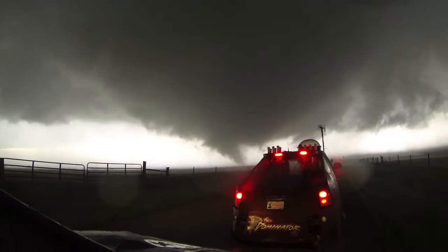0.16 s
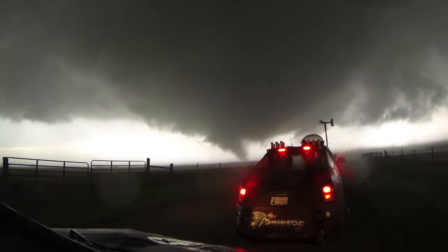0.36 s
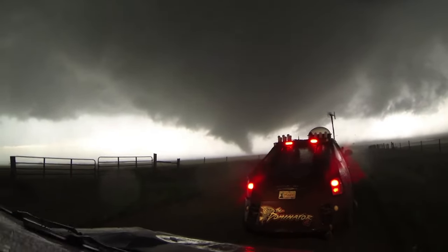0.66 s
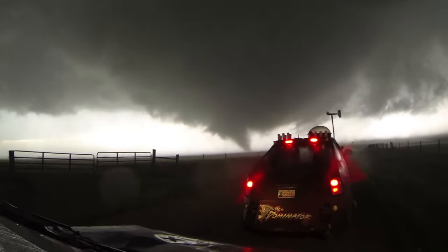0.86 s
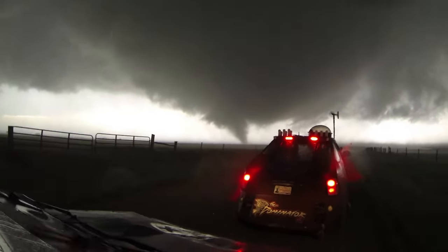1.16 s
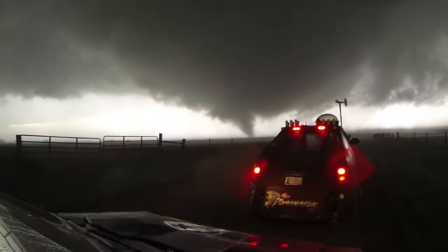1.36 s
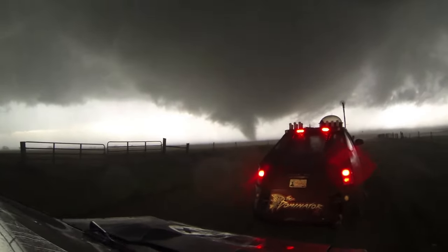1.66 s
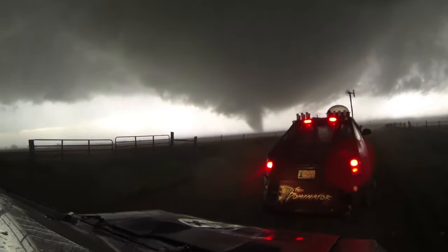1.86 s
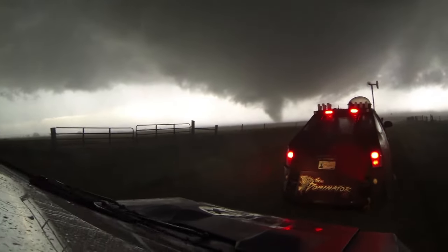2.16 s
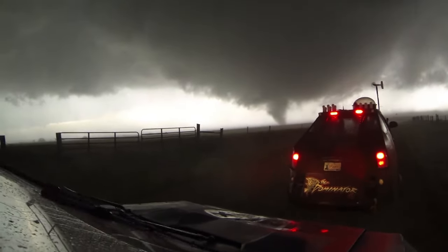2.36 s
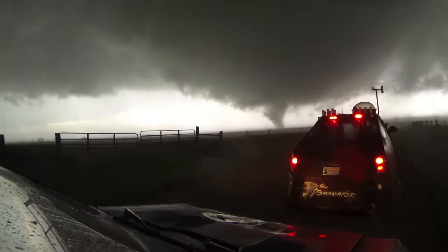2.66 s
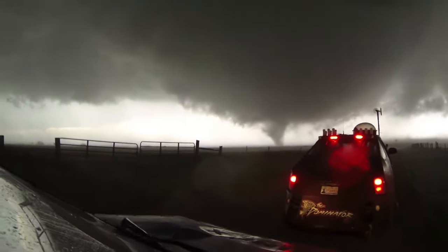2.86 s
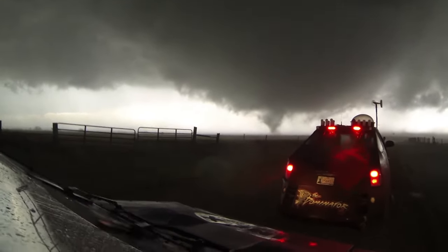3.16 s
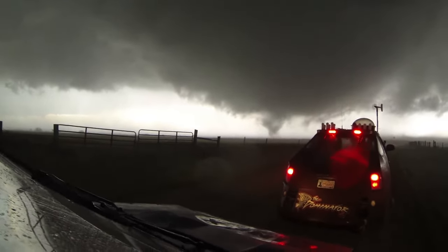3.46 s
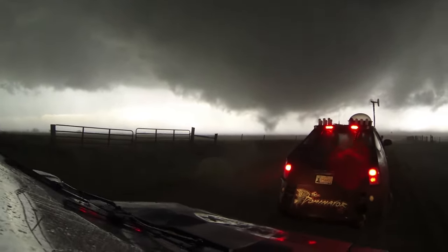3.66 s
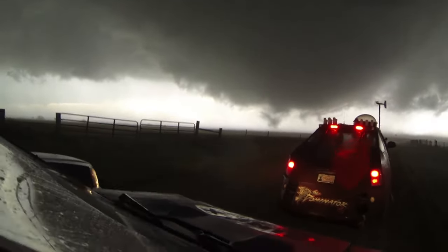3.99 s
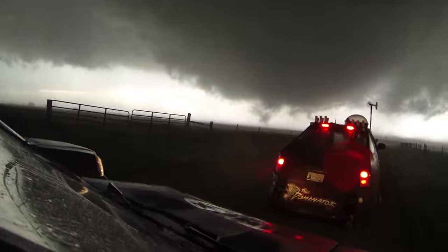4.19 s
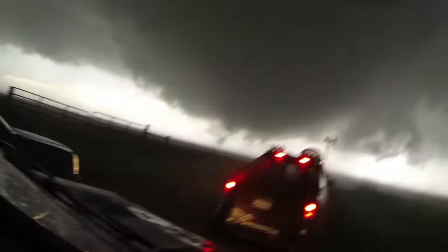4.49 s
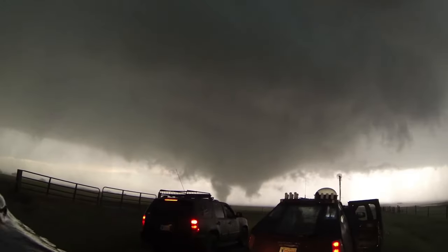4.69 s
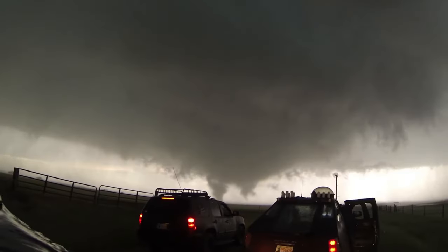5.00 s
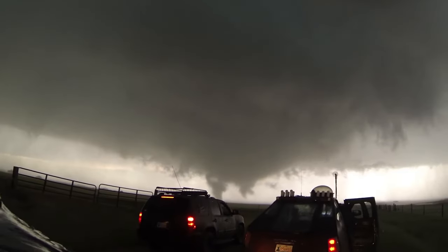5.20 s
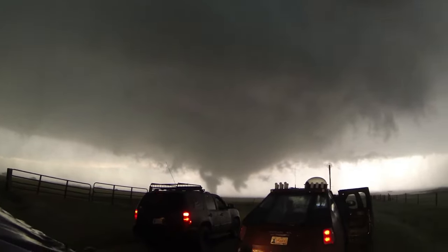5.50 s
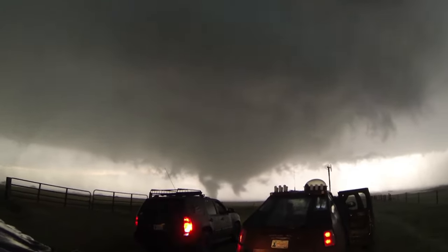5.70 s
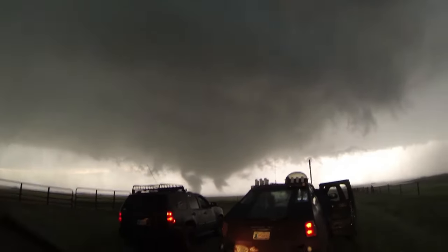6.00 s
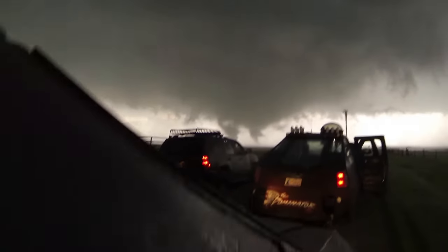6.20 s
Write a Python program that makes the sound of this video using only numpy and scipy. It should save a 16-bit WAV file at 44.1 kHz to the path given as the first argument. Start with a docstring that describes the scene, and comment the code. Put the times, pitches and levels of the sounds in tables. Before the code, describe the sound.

Outdoors on open fields in a storm, a microphone close to a vehicle's side catches hailstones striking the bodywork: sharp, dry cracks with faint short rings, the loudest overloading. Rain sheets hiss and crackle across the panels, and wind rumbles and flutters. After nearly five seconds the background drops suddenly and the hits become rare, leaving low gusts that swell strongly towards the end.

```python
"""Hail pelts a vehicle in a storm, with rain and gusts, heard by a microphone held close at its side.
Each stone is a burst of contacts coloured by the bodywork, with a faint ring; the loudest overload.
Wind is shaped noise that buffets, rumbles and flutters; sheets of fine drops hiss and crackle in it.
Fat drops tick on glass, over a soft noise of rain on open fields and a thin electronic whine."""
import sys
import numpy as np
from scipy import signal
from scipy.fft import rfft, irfft
from scipy.io import wavfile
from scipy.ndimage import uniform_filter1d

SR = 44100
rng = np.random.default_rng(int(sys.argv[2]) if len(sys.argv) > 2 else 0)


def unload_wav(signal):
    """Save mono or channel-first audio to the path in sys.argv[1] as 16-bit WAV at rate SR, clipped to [-1, 1]."""
    wavfile.write(
        sys.argv[1],
        SR,
        np.round(np.clip(np.atleast_2d(signal).T, -1, 1) * 32767).astype(np.int16),
    )


N = 279814
TIME = np.arange(N) / SR

# wind between gusts: [t/s, strength/dB (0 is a moderate gust), extra push of large eddies/dB]
BREEZE = [(0, -21, 10), (.28, -4.5, -2.5), (.45, -13, 6), (.7, -6, -1), (.95, -7.5, 6.5), (1.55, -6, 6),
          (1.9, -14.5, 0.5), (2.3, -16.5, 1.5), (2.68, -16, 4), (2.95, 0, 6.5), (3.45, -6.5, 0),
          (3.75, -16, 2.5), (4.35, -12, 8), (4.75, -12, 5), (4.94, -20, 4), (5.15, -7.5, -1.5),
          (5.55, -3.5, 7.5), (6.05, 1, 1.5), (6.34, 1, 17)]
# changing level of the background: [t/s, level/dB]
BACKGROUND_LEVEL = [(0, 2.5), (2.6, 1.5), (4.72, -0.5), (4.8, -15.5), (5.55, 8), (6.1, -9), (6.34, 13.5)]


def hailstones(stones, spot_db=6, spot_width=0.12, scatter_s=0.0019, rattle_share=1.36,
               ring_db=0, level_db=1, size=4096):
    """Each stone cracks on its own spot of the vehicle; the whole body rings faintly after it."""
    # colour of a blow on the vehicle: [f/Hz, level/dB]
    body_colour = [(100, -2), (300, -8), (450, -4.5), (850, -7), (1150, 1), (1500, 1), (2400, -1.5),
                   (3000, -5), (3500, -2), (4800, -16.5), (6200, -19.5), (7500, -28.5), (10500, -28.5),
                   (15500, -44)]
    # modes that ring after every blow: [f/Hz, level/dB against the blow's colour there, t60/s]
    ring_modes = [(380.5, -19, .05), (1100, -25, .025), (3390, -21, .06), (3560, -23, .05),
                  (4210, -28.5, .03), (4850, -36, .083), (6590, -34, .12), (6820, -33, .07)]
    out = np.zeros(N)
    t = np.arange(size) / SR
    hz = np.fft.rfftfreq(size, 1 / SR)
    five_ms = SR / 200  # in samples
    low = 1 / (1 + (hz / 900) ** 6)
    high = 1 - 1 / (1 + (hz / 4900) ** 8)
    # bending waves carry the treble through a panel faster than the bass
    lag_s = .0007  # delay at 1 kHz
    travel = np.exp(-4j * np.pi * lag_s * np.sqrt(1000 * hz))
    chances = rng.standard_normal((len(stones), size))
    for (s, db, spot_hz, thump_db, snap_db, rattle_db), chance in zip(stones, chances):
        # a heavy stone moves more of the panel, so its resonance is broader
        width = spot_width * (1 + 2.0 * gain_of(db))
        colour_db = read(body_colour, hz) + spot_db * spot(hz, spot_hz, width)
        colour_db = colour_db + thump_db * low + snap_db * high
        contacts = scatter(chance, scatter_s, rattle_share * gain_of(rattle_db))
        crack = irfft(rfft(response(colour_db)) * rfft(contacts) * travel)
        crack *= np.sqrt(five_ms / np.sum(crack ** 2))
        # each mode answers as strongly as the blow is at its pitch
        ring = np.zeros(size)
        for c, (f, mode_db, t60) in zip(chance[::-1], ring_modes):
            fading_db = mode_db + np.interp(f, hz, colour_db) - 60 * t / t60
            ring += np.sign(c) * gain_of(fading_db) * np.sin(2 * np.pi * f * t)
        add(out, s - lag_s / 2, gain_of(db + level_db) * (crack + gain_of(ring_db) * ring))
    return out


def pellets(water, rate_power=0.66, size_power=0.26, thump_db=0, snap_db=6, rattle_db=-2,
            vary_db=4.0, count=500):
    """Small stones fall at random, more and heavier with the water; rows as for the single stones."""
    full_per_s, full_db, spread_db = 52, -33.5, 4  # in a full downpour
    low_hz, high_hz = 1160, 3600  # pitches of the struck spots
    rows = []
    chances = zip(rng.random((count, 3)), rng.standard_normal((count, 4)))
    for (when, luck, place), (size, thump, snap, rattle) in chances:
        wet = water[int(when * N)]
        expected = full_per_s * wet ** rate_power * N / SR
        if luck < expected / count:
            db = full_db + size_power * 20 * np.log10(wet) + spread_db * size
            spot_hz = low_hz * (high_hz / low_hz) ** place
            rows.append((when * N / SR, db, spot_hz, thump_db + vary_db * thump,
                         snap_db + vary_db * snap, rattle_db + vary_db * rattle))
    return rows


def scatter(chance, decay_s, share):
    """A first contact, then a fast-dying crowd of fragments and reflections from nearby panels."""
    t = np.arange(len(chance)) / SR
    crowd = chance * np.exp(-t / decay_s)
    return (t == 0) + share * crowd / np.linalg.norm(crowd)


def spot(hz, centre_hz, width):
    """The broad resonance of one struck place, from 0 to 1."""
    return 1 / (1 + ((hz / centre_hz - 1) / width) ** 2)


def wind(push, rumble, flutter, buffet_db=-26, rumble_db=-31.0, flutter_db=-38,
         gusty_db=1.4, lumpy_db=6.0):
    """Large eddies push on the microphone; smaller ones rumble and flutter in lumps on top."""
    # spectra of the three eddy sizes, large to small: [f/Hz, level/dB]
    buffet_colour = [(8, -28.5), (20, 6), (33, -0.5), (50, -2), (70, -12.5), (110, -29), (300, -58.5),
                     (3000, -130)]
    rumble_colour = [(35, -13.5), (72, 3.5), (110, -3), (155, -7), (230, -22), (500, -69), (4000, -120)]
    flutter_colour = [(90, -20.5), (165, 5), (240, 0), (385, 0), (520, -8.5), (750, -17.5), (1500, -24.5),
                      (4000, -66.5), (12000, -100)]
    large, middle, small = rng.standard_normal((3, N))
    small = small * gain_of(lumpy_db * drift(55))
    eddy_s = .06
    gusty = gain_of(gusty_db * drift(32))
    buffets = gain_of(buffet_db) * push * steadied(coloured(large, buffet_colour), eddy_s)
    rumbles = gain_of(rumble_db) * rumble * steadied(coloured(middle, rumble_colour), eddy_s / 2)
    flutters = gain_of(flutter_db) * flutter * steadied(coloured(small, flutter_colour), eddy_s / 2)
    return gusty * (buffets + rumbles + flutters)


def weather():
    """Gains over time of the wind's push, rumble, flutter and blast, and the amount of water."""
    # thin rain between sheets: [t/s, level/dB (0 is a full downpour)]
    drizzle = [(0, -14), (.25, -40), (.45, -23.5), (.8, -20.5), (1, -28), (1.9, -24.5), (2.1, -18),
               (2.25, -15), (2.6, -24), (2.85, -20), (3.6, -20.5), (3.8, -19.5), (4.3, -34.5),
               (4.55, -18.5), (4.8, -52), (5.3, -58.5), (5.6, -40), (6.34, -48)]
    # water thrown against the panels: [start/s, length/s, level/dB (0 is a full downpour)]
    sheets = [(0, 0.061, -33), (0.855, 0.034, -10), (1.012, 0.04, -11.5), (1.187, .13, 1.5),
              (1.382, 0.054, -2.5), (1.463, .25, 0), (1.721, 0.14, -11.5), (2.014, 0.029, -3),
              (2.253, 0.061, -5.5), (2.807, 0.017, -9), (2.909, .2, -0.5), (3.135, 0.28, -3.5),
              (3.48, 0.082, -8.5), (4.002, .025, -13), (4.183, .025, -12), (5.698, 0.032, -4),
              (5.97, .06, -28)]
    # each layer grows as its own power of the wind's strength
    # large eddies in a gust arrive 5 ms after the small ones
    push = gusting(0.63, 3, 0.005, between(BREEZE, 2))
    rumble = gusting(1, 4)
    flutter = gusting(1, None)
    blast = gusting(0.91, 5)
    water = surging(between(drizzle), sheets, rise_s=0.021, fall_s=0.022)
    return push, rumble, flutter, blast, water


def gusting(power, column, lag_s=0, extra_db=0):
    """Gain of one wind layer: breeze and gusts raised to its power, plus each gust's own share."""
    # gusts: [start/s, length/s, strength/dB, extra push of large eddies/dB,
    #         extra rumble/dB, extra roar of the air/dB]
    gust_rows = [(0, 0.0083, 20, -1.5, -6, -4), (0.534, 0.12, -2.5, 3.5, 4, 2.5),
                 (1.158, 0.18, 2.5, 1.5, 5, 6), (1.588, 0.07, 5, -9, 2, 9),
                 (2.176, 0.18, -10.5, -17, 1.5, 6.5), (2.82, 0.054, 0.5, -6.5, 2, 2.5),
                 (2.911, 0.15, 6.5, 2.5, 2.5, 4.5), (3.111, 0.03, 8, 6, 3, 9.5),
                 (3.316, 0.21, 5, 0.5, -2, 0.5), (3.924, .12, -5, -5, 1, -1),
                 (4.163, 0.023, -4, -13, -17, 4), (4.439, 0.18, 3, 2.5, 1.5, 0.5),
                 (4.619, 0.07, 12.5, -2, 0.5, -1), (4.779, 0.019, 2.5, 0, 1, -2.5),
                 (5.367, 0.076, -1, 6, -1, -5), (5.677, 0.097, 17.5, 6, 1.5, 5),
                 (5.882, 0.12, 8, 1, 1.5, 2), (6.13, 0.23, 8, -5, -26, -12)]
    rise_s, fall_s = 0.055, 0.015 / power
    gusts = []
    for row in gust_rows:
        own_db = row[column] if column else 0
        gusts.append((row[0] + lag_s, row[1], power * row[2] + own_db))
    return surging(power * between(BREEZE) + extra_db, gusts, rise_s, fall_s)


def surging(base_db, surges, rise_s, fall_s):
    """A base level with surges on top; each rises, holds for its length and dies away."""
    power = gain_of(base_db) ** 2
    for start, length, db in surges:
        near = slice(*np.searchsorted(TIME, [start - rise_s, start + length + 10 * fall_s]))
        t = TIME[near] - start
        attack = np.clip(t / rise_s + .5, 0, 1)
        release = np.exp(-np.maximum(t - length, 0) / fall_s)
        power[near] += (gain_of(db) * attack * release) ** 2
    return np.sqrt(power)


def rain(blast, water, wind_roar_db=-48.0, wind_hiss_db=-55, water_roar_db=-38.0, water_hiss_db=-37,
         spray_db=-44, soaked_ratio=0.38, most_drops=0.85, sheets_db=3.0, mist=0.5):
    """Rushing air is a smooth noise; the more water it carries, the more it crackles with drops."""
    # spectra of the three bands: [f/Hz, level/dB]
    roar_colour = [(300, -15), (600, -12.5), (900, -8), (1100, -1.5), (1500, 1), (2100, -6.5),
                   (2800, -27.5), (5000, -35), (12000, -87.5)]
    hiss_colour = [(1200, -21), (2300, 6.5), (2950, -6), (3480, -6.5), (4200, -20), (4900, -26.5),
                   (6300, -23), (9000, -58.5), (15500, -71.5)]
    spray_colour = [(1500, -56), (3500, 3), (4900, -1), (6400, 3), (7600, -6.5), (9700, -4.5),
                    (12000, -7.5), (13500, -12.5), (15000, -14), (16000, -48)]
    roar = np.hypot(gain_of(wind_roar_db) * blast, gain_of(water_roar_db) * water)
    hiss = np.hypot(gain_of(wind_hiss_db) * blast, gain_of(water_hiss_db) * water)
    spray = gain_of(spray_db) * water
    per_s = 100 + 450 * np.sqrt(water)
    air = evened(rng.standard_normal(N) * gain_of(sheets_db * drift(60)))
    taps = steadied(patter(per_s, 6.0, 0.001, 1100, 6000), 0.048)
    ticks = steadied(patter(per_s, 6.2, 0.0015, 5800, 15000), 0.1)
    # share of the power that is drops rather than smooth air
    share = np.clip((spray / hiss / soaked_ratio) ** 2, 0, most_drops)
    rush = np.sqrt(1 - share) * air + np.sqrt(share) * taps
    fizz = np.sqrt(share) * (ticks + taps) + mist * air
    sheet_s = .07
    return (roar * steadied(coloured(rush, roar_colour), sheet_s)
            + hiss * steadied(coloured(rush, hiss_colour), sheet_s)
            + spray * steadied(coloured(fizz, spray_colour), sheet_s))


def patter(per_s, spread_db, decay_s, lowest_hz, highest_hz, count=20):
    """Drops land on many spots, each with its own pitch and short splash."""
    out = np.zeros(N)
    hz = np.fft.rfftfreq(2 ** 9, 1 / SR)
    for centre_hz in np.geomspace(lowest_hz, highest_hz, count):
        knock = response(9 * spot(hz, centre_hz, .25))
        splash = np.convolve(knock, scatter(rng.standard_normal(2 ** 8), decay_s, 0.38))
        out += signal.oaconvolve(drops(per_s / count, spread_db), splash)[:N]
    return evened(out)


def drops(per_s, spread_db, largest=4):
    """Clicks at random moments: many small, a few large; denser rain has the same mean power."""
    size_db = spread_db * np.minimum(rng.exponential(1, N), largest)
    size = gain_of(size_db) / np.sqrt(per_s)
    return size * rng.choice([-1, 1], N) * (rng.random(N) < per_s / SR)


def drips(water, per_s=45, spread_db=7.5, level_db=-45, wet_power=0.56, splash_s=0.0024):
    """Single fat drops tick on the glass, standing out most where the rain is thin."""
    # colour of drops on the glass: [f/Hz, level/dB]
    glass_colour = [(500, -27.5), (1300, 1), (3500, 0.5), (5000, -10.5), (7000, -6.5), (11000, -5.5),
                    (14000, -17), (16000, -31)]
    ticks = patter(per_s, spread_db, splash_s, 2200, 9000)
    return gain_of(level_db) * water ** wet_power * coloured(ticks, glass_colour)


def far_rain(wash_db=-59, hiss_db=-75):
    """Rain on the open fields leaves a soft wash and hiss, as noise under a changing level."""
    # colour of the wash: [f/Hz, level/dB]
    wash_colour = [(200, -30.5), (420, 0), (700, -14.5), (900, 1), (1100, 0), (1500, 2.5), (2300, 2),
                   (2950, -6), (3500, -11), (4200, -5.5), (4900, -18.5), (6300, -19), (9000, -37),
                   (15000, -54)]
    wash, hiss = rng.standard_normal((2, N))
    hiss = coloured(hiss, [(2000, -8.0), (4000, -0.5), (6500, -13), (10000, -9.5), (15000, -29)])
    wash = coloured(wash, wash_colour)
    return gain_of(between(BACKGROUND_LEVEL)) * (gain_of(wash_db) * wash + gain_of(hiss_db) * hiss)


def whine(level_db=-79, centre_hz=7720, waver_db=3):
    """A thin electronic tone: a sine that wavers in strength and slightly in pitch."""
    waver = gain_of(waver_db * drift(50))
    pitch_hz = centre_hz + 25 * drift(60)
    tone = np.sin(2 * np.pi * np.cumsum(pitch_hz) / SR)
    return gain_of(level_db) * evened(waver * tone)


def gain_of(db):
    """Decibels to amplitude."""
    return 10 ** (np.asarray(db) / 20)


def evened(x):
    """Scales to rms 1."""
    return x / np.sqrt(np.mean(x ** 2) + 1e-20)


def steadied(x, seconds):
    """Holds the power of a noise near 1 over spans of this length."""
    size = max(int(seconds * SR), 2)
    power = uniform_filter1d(uniform_filter1d(x ** 2, size), size)
    return x / np.sqrt(abs(power) + 1e-9)


def drift(hz):
    """Slow chance of rms 1, up to a rate."""
    f = np.fft.rfftfreq(N, 1 / SR)
    return evened(irfft(rfft(rng.standard_normal(N)) / (1 + (f / hz) ** 4), N))


def read(points, hz):
    """A spectrum table, joined by straight lines over log frequency."""
    f, db = np.transpose(points)
    return np.interp(np.log(hz + 1), np.log(f), db)


def response(db):
    """The causal impulse response of a dB spectrum: sharp front, then decay."""
    log_gain = np.log(gain_of(np.r_[db, db[-2:0:-1]]))
    return np.fft.ifft(np.exp(np.conj(signal.hilbert(log_gain)))).real


def coloured(x, points):
    """Gives a long sound a spectrum, at rms 1."""
    shape = response(read(points, np.fft.rfftfreq(2 ** 14, 1 / SR)))
    return evened(irfft(rfft(x) * rfft(shape, N), N))


def between(curve, column=1):
    """One column of a curve table at every sample."""
    rows = np.transpose(curve)
    return np.interp(TIME, rows[0], rows[column])


def add(mix, s, sound):
    """Mixes a sound in at time s."""
    part = mix[max(round(s * SR), 0):][:len(sound)]
    part += sound[:len(part)]


def scene():
    """Hail, wind, rain and background, all at one microphone."""
    # single hailstones, loud and faint, that stand out:
    # [t/s, level/dB over 5 ms before the hail's trim, pitch of the struck spot f/Hz,
    #  thump/dB, snap/dB, rattle after the first contact/dB]
    single_stones = [(.0305, -17.5, 3600, 8, 14.5, -13), (0.0468, -11.5, 3100, -12, 8, 0),
                     (.335, -22.5, 2370, -11, 10, 19), (0.3706, -8.5, 1900, -3, -6.5, 5),
                     (0.4844, -33, 3750, -15, 3.5, -3), (0.707, -14.5, 2200, 2, 7, -6.5),
                     (.7176, -23.5, 2470, -10, 8, -7), (0.8619, -15, 2070, -9, 12.5, -7.5),
                     (0.9024, -17, 1960, 8, -7, -5), (1.0976, -28, 1310, -3, 13, -15),
                     (1.13, -31, 1848, -1, 1, 0), (1.1595, -26.5, 3570, -10, 13.5, -11),
                     (1.1826, -22, 1440, 10, -2, 2), (1.2076, -23.5, 1850, 1, 15, 20),
                     (1.2901, -18, 1330, 6, 12, -35), (1.307, -18.5, 1400, 6, 12.5, 26),
                     (1.3781, -17, 1260, 4, -2, 8.5), (1.4532, -17, 1400, -9, 4, -10),
                     (1.4684, -14.5, 4300, -68, 5, 28), (1.5043, -20.5, 1420, -6, 7.5, 13),
                     (1.5956, -24, 4290, -3, 1.5, -2.5), (1.6004, -16.5, 2840, 6.5, 12, 7.5),
                     (1.6173, -17, 3480, -20, 4.5, -17.5), (1.664, -15, 3450, -42, 16, -31.5),
                     (1.7014, -2.5, 4200, -16, -9, -1.5), (1.7082, -23, 4590, 3.5, 29.5, -39.5),
                     (1.741, -23, 1330, -2, 10, -10), (1.758, -17.5, 2820, -11, 9.5, 0),
                     (1.7609, -21, 1850, 2.5, 7, 15), (1.8454, -22, 1290, 2, 15, 10),
                     (1.8569, -22, 2430, -12, 7, -18), (1.979, -11.5, 4260, -0.5, 10.5, 10.5),
                     (2.135, -16, 3900, -9, 9.5, -5), (2.1605, -26.5, 1170, 7, -1, 13),
                     (2.1655, -17.5, 4200, -3.5, 14, 22), (2.2708, -35.5, 2330, 11, 3, 4),
                     (2.3655, -27, 1380, -3, -11, -9), (2.422, -28, 1220, 8, 10, -5),
                     (2.506, -14, 2180, -2, -4.5, -5), (2.8077, -36, 1250, -10, 8, 7),
                     (2.8502, -12.5, 1770, 14, 3.5, 3.5), (2.9407, -29.5, 1480, -7, 10, -2.5),
                     (3.0343, -26.5, 1490, -5, -2, -13), (3.098, -17.5, 4140, -40, 13.5, 30),
                     (3.1637, -18.5, 3490, -5.5, 10, -1), (3.195, -25, 2420, -8.5, -1.5, -15),
                     (3.263, -26, 1440, 2, -4, 7), (3.2704, -20, 2280, -15, 8, 3.5),
                     (3.299, -13, 3540, -1.5, 9, -10), (3.3551, -11, 1450, 15.5, -6, -2.5),
                     (3.4031, -20, 2070, 17, -3, 11), (3.4265, -17, 2500, -25, 3, -7),
                     (3.444, -15.5, 4100, -7, 8.5, 8), (3.4626, -13, 1210, 9, 15, -1),
                     (3.474, -12, 1150, 10.5, -8.5, 29), (3.5641, -12, 2800, 5.5, 18, 18.5),
                     (3.7663, -19, 2000, -8, 6.5, -3), (3.8308, -18, 2600, -8.5, -7, -9),
                     (3.882, -14, 1800, -10.5, 9, 20), (3.9235, -34, 3700, -1, 14, -1),
                     (4.0186, -23, 2460, -6, 0, 3), (4.1594, -24, 4330, -79, 1, 13),
                     (4.1834, -25, 1530, 8, 15, 6), (4.2684, -19.5, 1160, 3.5, 13.5, 15),
                     (4.3382, -28, 1450, -20, 13.5, 3), (4.4849, -28.5, 1140, 10, -23, 7),
                     (4.4933, -27, 1270, 12, 10.5, 3), (4.5389, -29, 2120, -15, 11.5, 3),
                     (4.5735, -27, 1710, 11, -6, -10), (4.614, -27, 1010, 17, 16, -31),
                     (4.6424, -29.5, 1850, -22, -5, 5), (4.7412, -15.5, 3500, -4.5, 8.5, 2.5),
                     (4.7787, -26, 2610, -40, 2, 0), (4.8519, -41.5, 1720, 8, -21, 3),
                     (5.0887, -39.5, 1420, 9, -33, -15), (5.3104, -24.5, 1530, 20.5, -2, 13),
                     (5.4397, -22, 4100, -67, 3.5, -3), (6.0973, -30, 1510, -8, -63, 17)]
    push, rumble, flutter, blast, water = weather()
    # the whine follows only part of the background's level changes, in dB
    background = far_rain() + gain_of(.35 * between(BACKGROUND_LEVEL)) * whine()
    storm = hailstones(single_stones) + wind(push, rumble, flutter) + rain(blast, water)
    return (background + storm + drips(water) + hailstones(pellets(water)))[None]


def record(dry):
    """The loudest cracks overload softly; then a low-pass sets the band limit."""
    limited = dry / (1 + (dry / .95) ** 4) ** (1 / 4)
    edge = signal.firwin(401, 15900, window=("kaiser", 9), fs=SR)  # cutoff in Hz
    return signal.oaconvolve(limited, edge[None], "same")


dry = scene()
out = record(dry)
unload_wav(out)
```